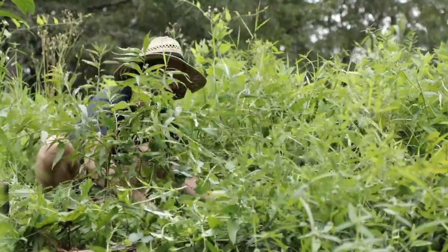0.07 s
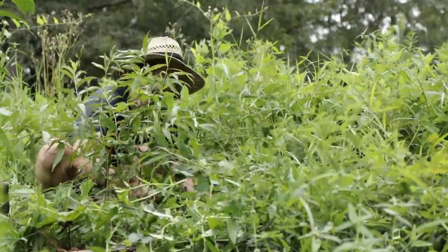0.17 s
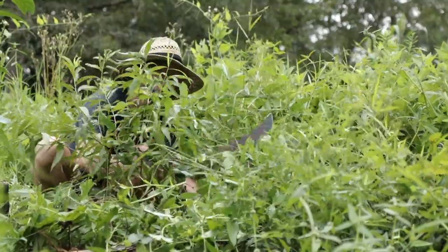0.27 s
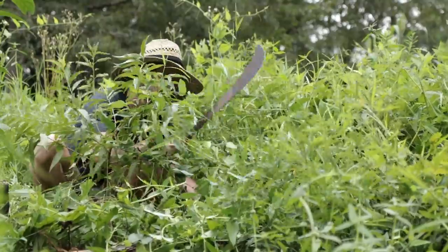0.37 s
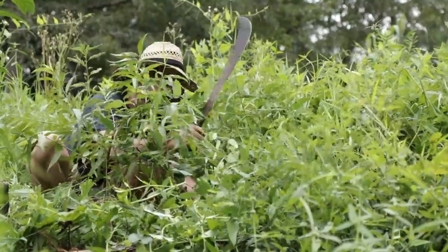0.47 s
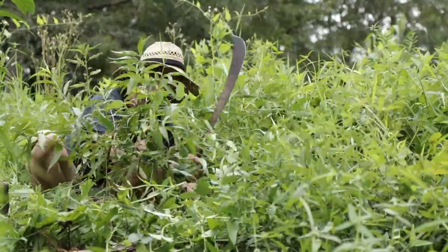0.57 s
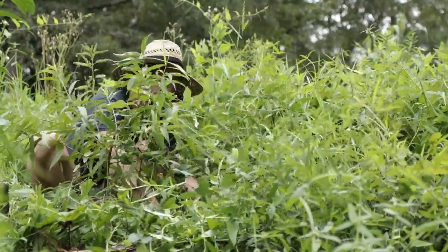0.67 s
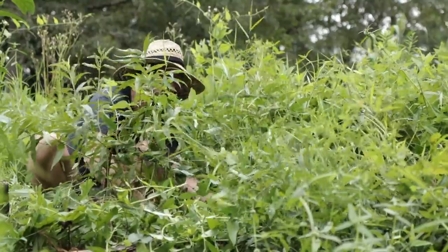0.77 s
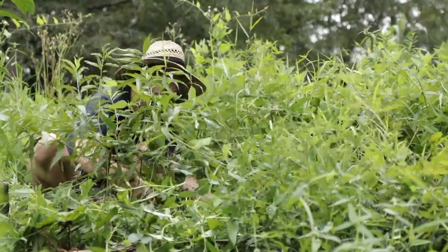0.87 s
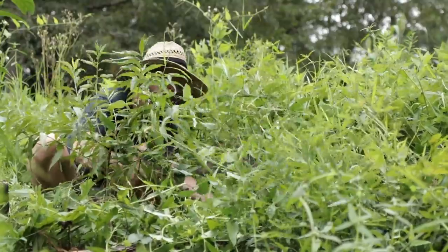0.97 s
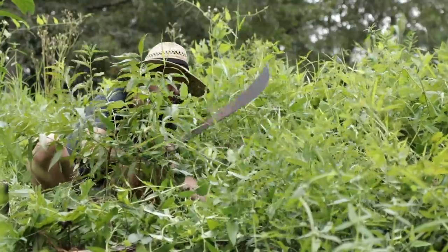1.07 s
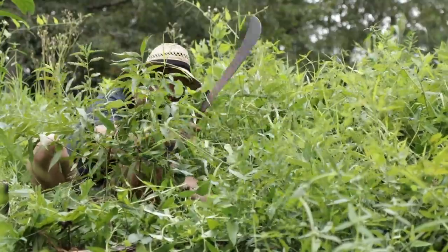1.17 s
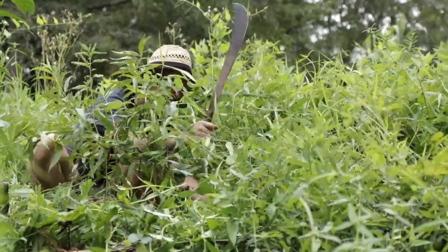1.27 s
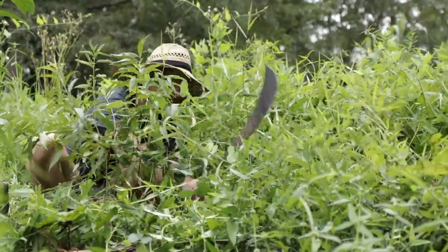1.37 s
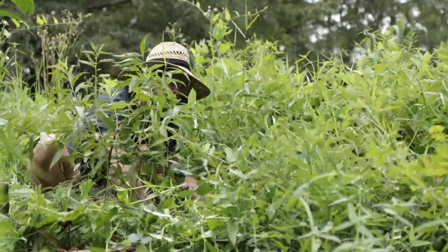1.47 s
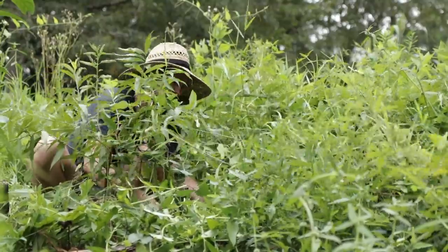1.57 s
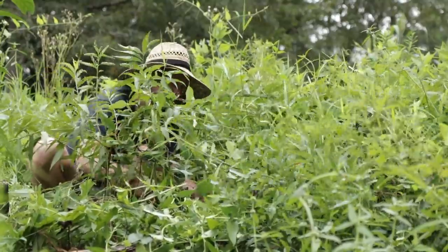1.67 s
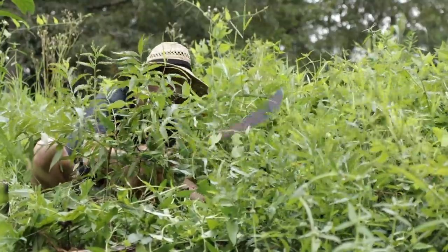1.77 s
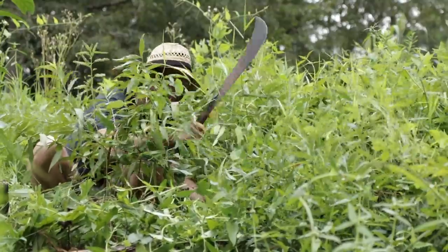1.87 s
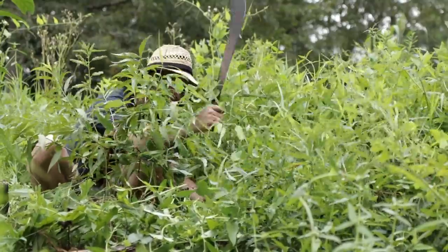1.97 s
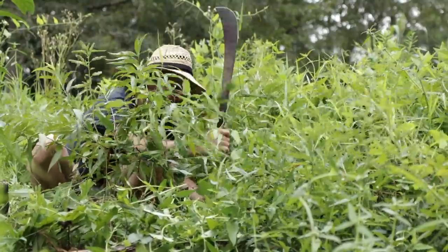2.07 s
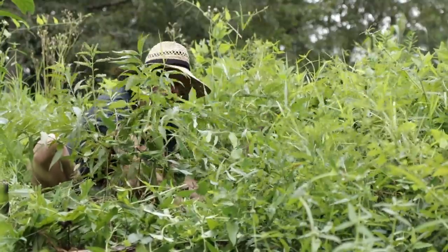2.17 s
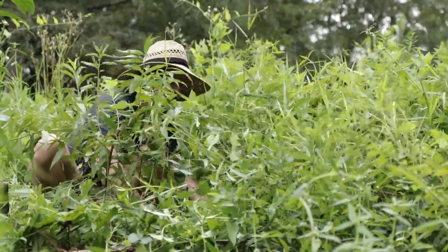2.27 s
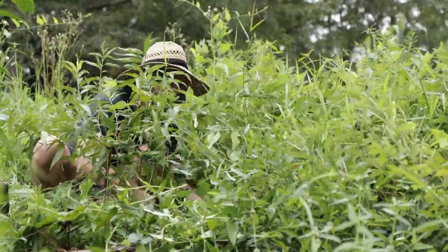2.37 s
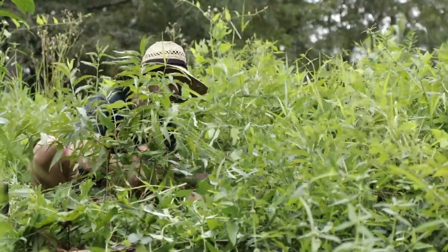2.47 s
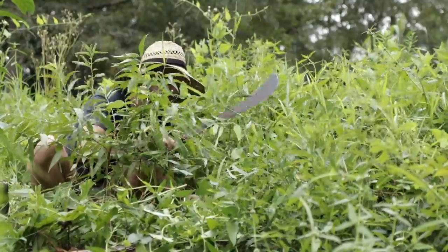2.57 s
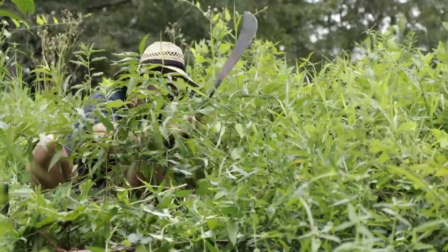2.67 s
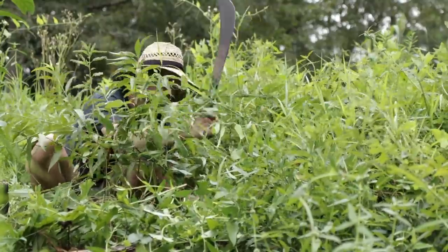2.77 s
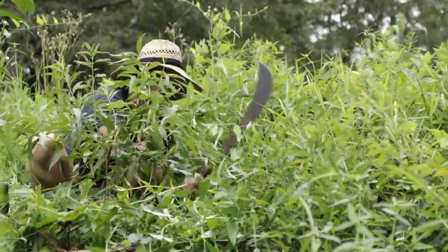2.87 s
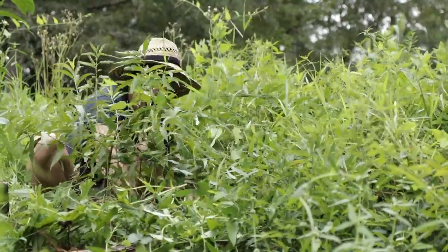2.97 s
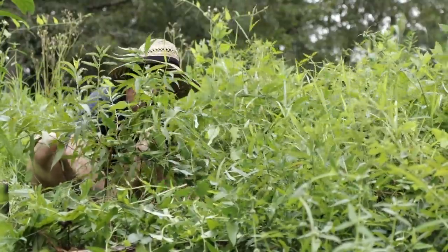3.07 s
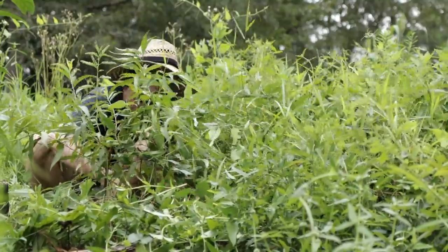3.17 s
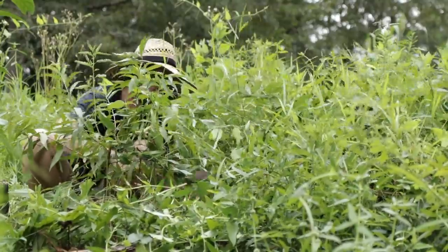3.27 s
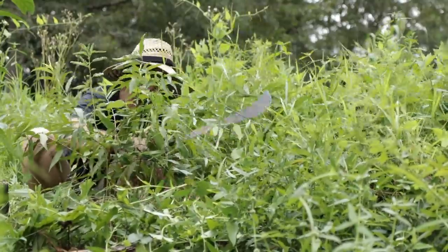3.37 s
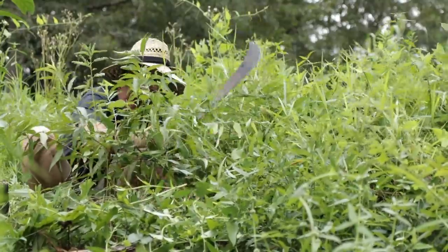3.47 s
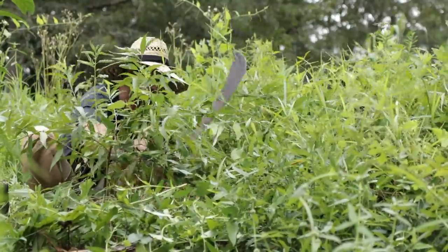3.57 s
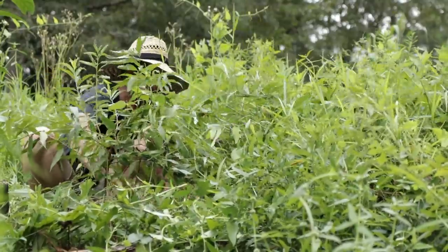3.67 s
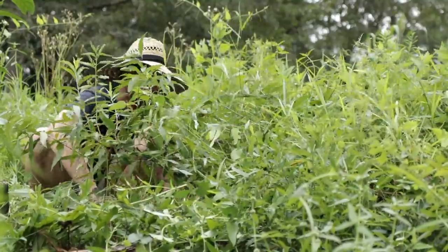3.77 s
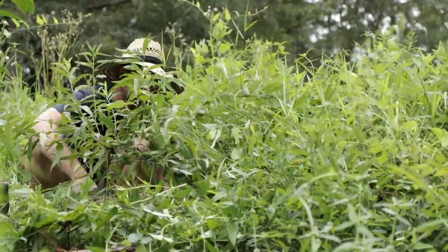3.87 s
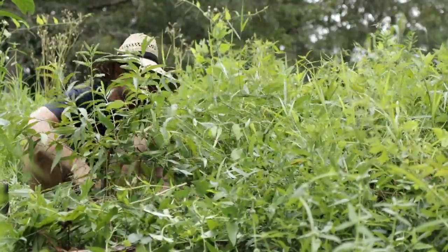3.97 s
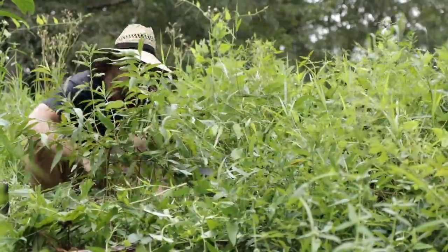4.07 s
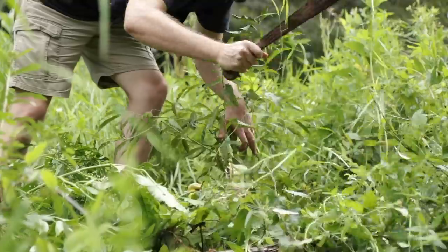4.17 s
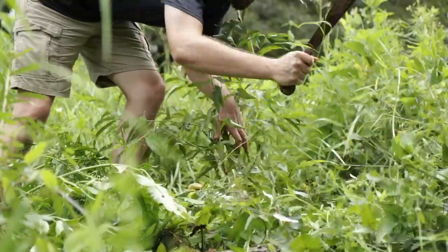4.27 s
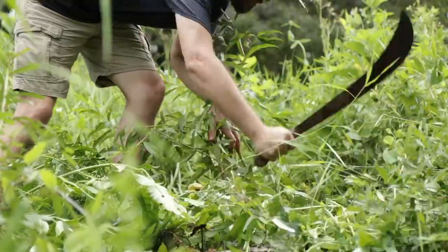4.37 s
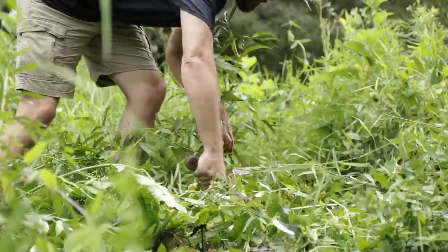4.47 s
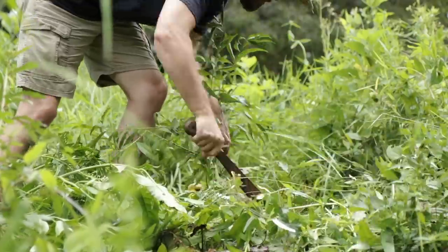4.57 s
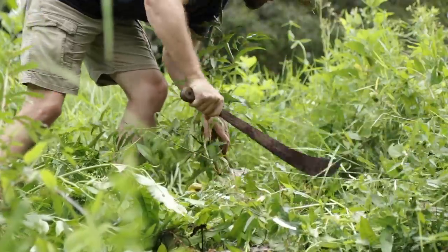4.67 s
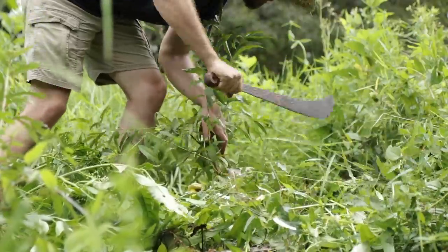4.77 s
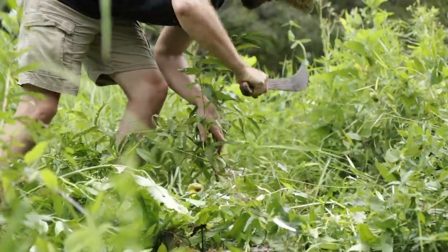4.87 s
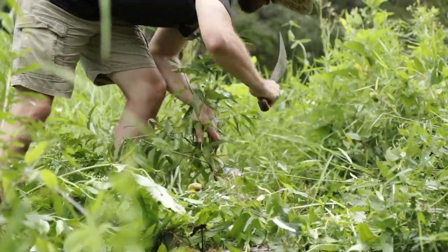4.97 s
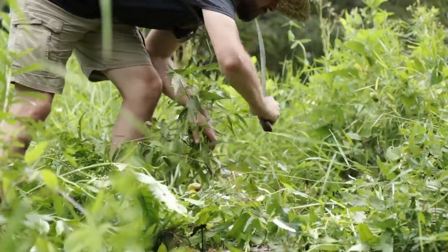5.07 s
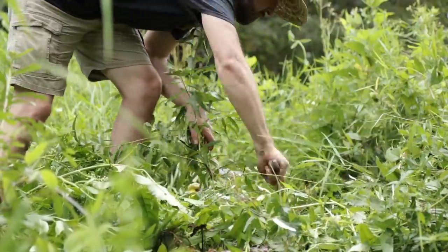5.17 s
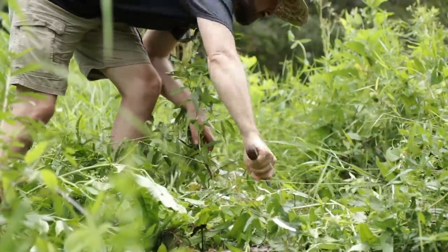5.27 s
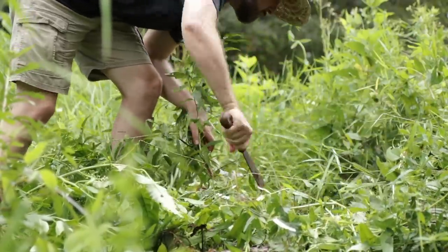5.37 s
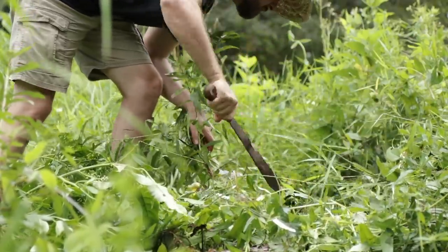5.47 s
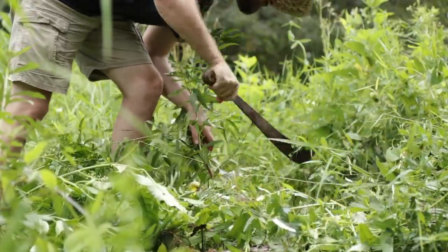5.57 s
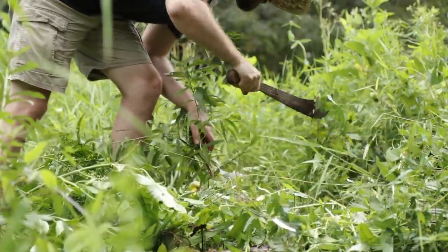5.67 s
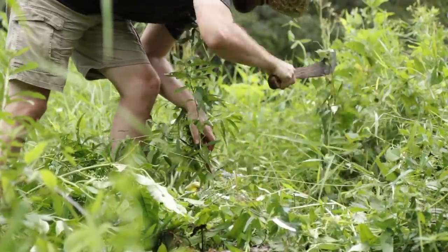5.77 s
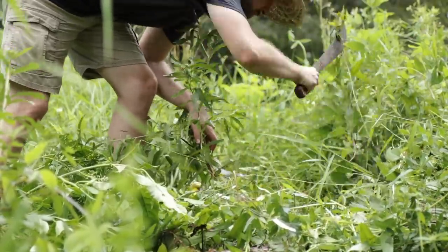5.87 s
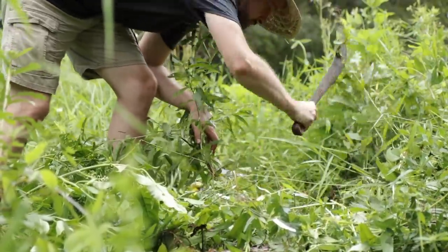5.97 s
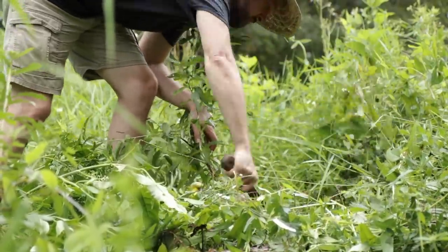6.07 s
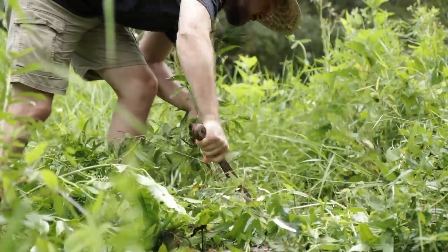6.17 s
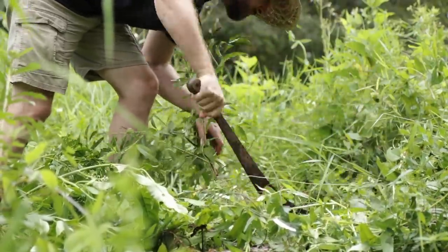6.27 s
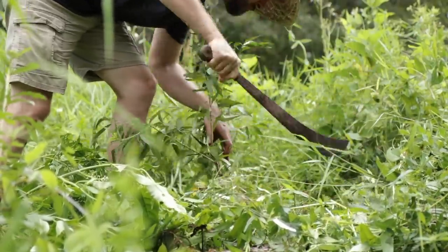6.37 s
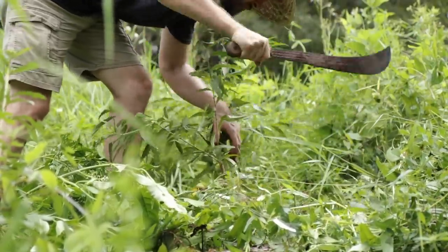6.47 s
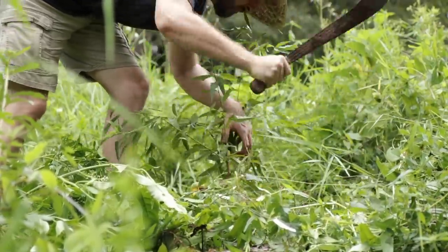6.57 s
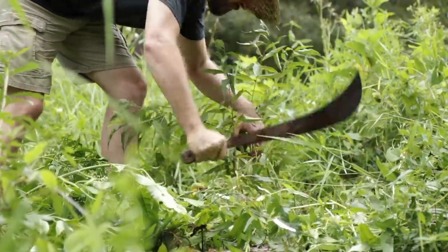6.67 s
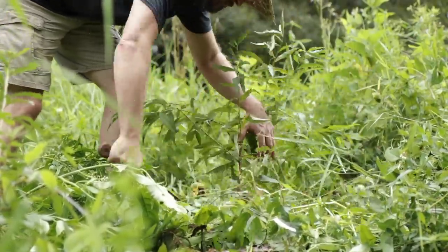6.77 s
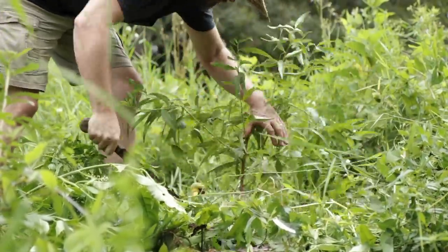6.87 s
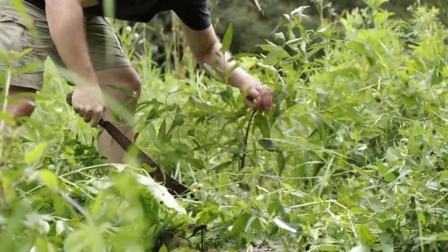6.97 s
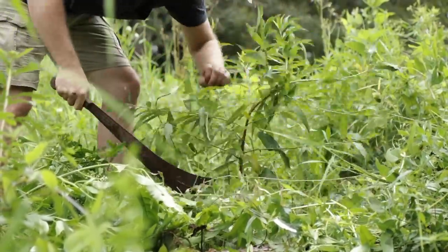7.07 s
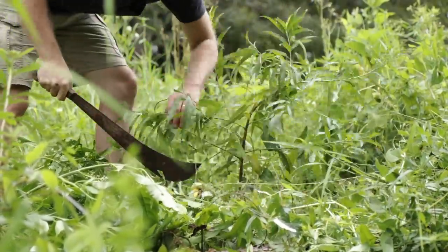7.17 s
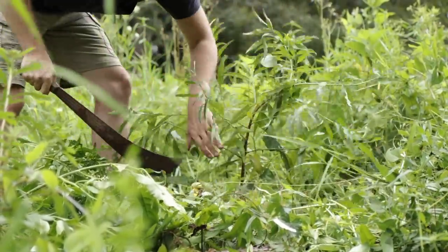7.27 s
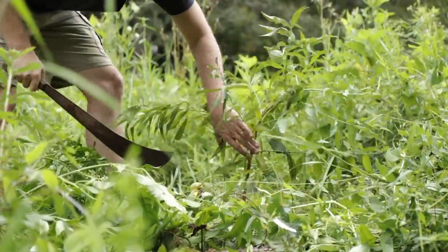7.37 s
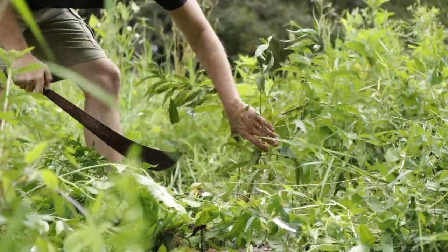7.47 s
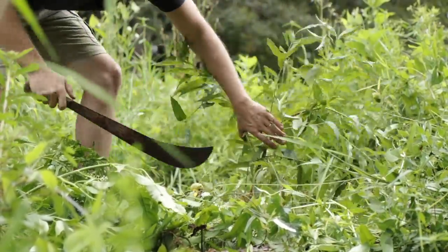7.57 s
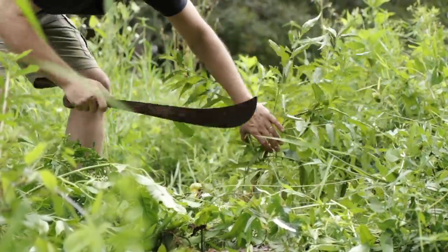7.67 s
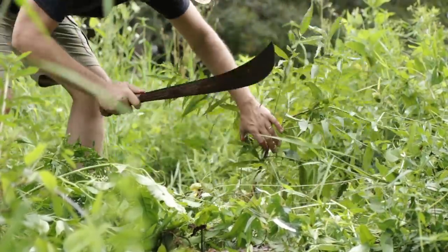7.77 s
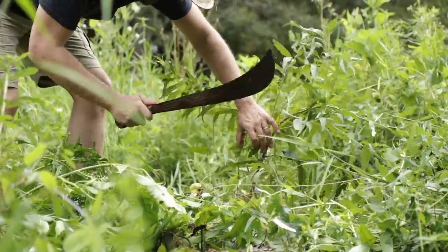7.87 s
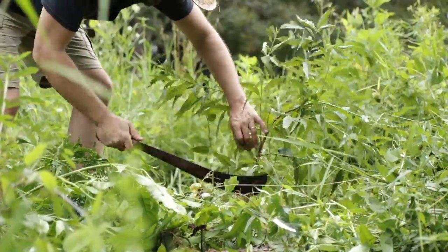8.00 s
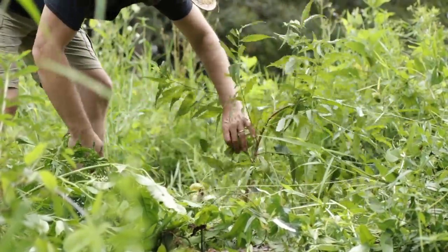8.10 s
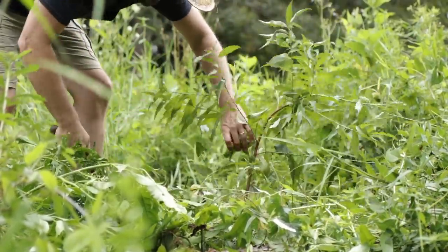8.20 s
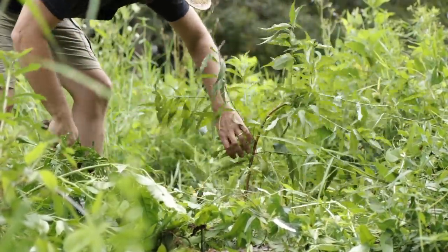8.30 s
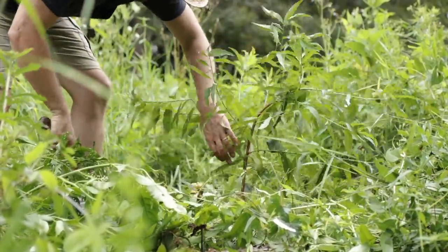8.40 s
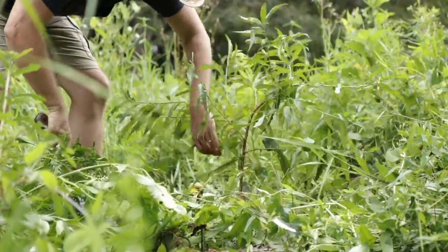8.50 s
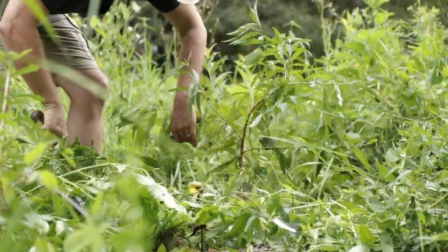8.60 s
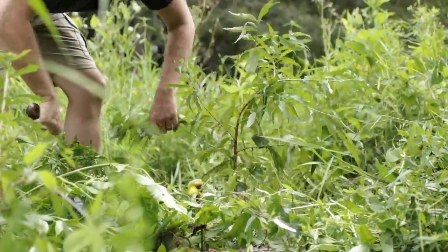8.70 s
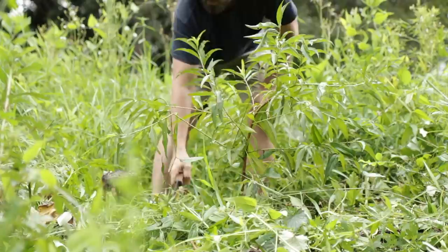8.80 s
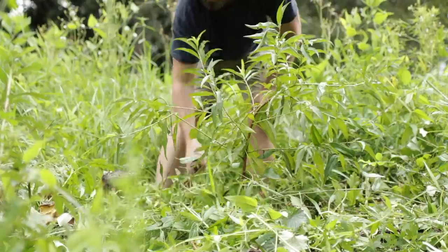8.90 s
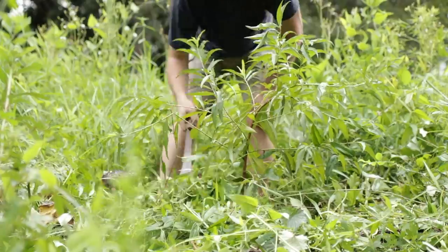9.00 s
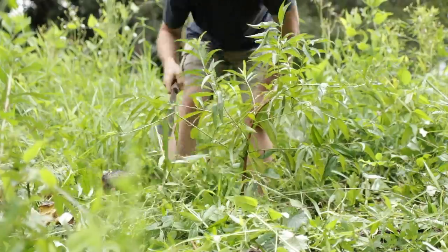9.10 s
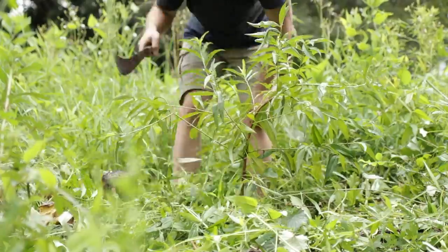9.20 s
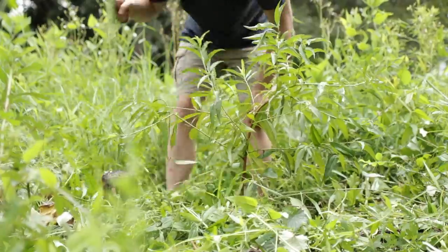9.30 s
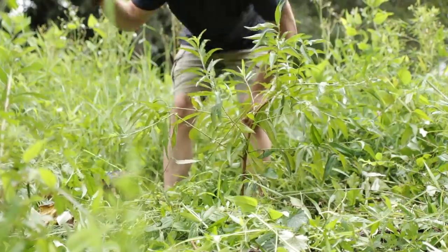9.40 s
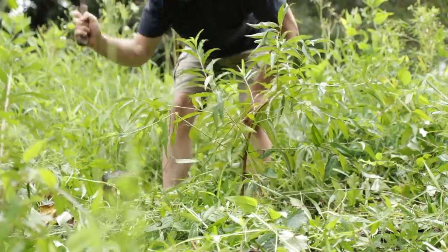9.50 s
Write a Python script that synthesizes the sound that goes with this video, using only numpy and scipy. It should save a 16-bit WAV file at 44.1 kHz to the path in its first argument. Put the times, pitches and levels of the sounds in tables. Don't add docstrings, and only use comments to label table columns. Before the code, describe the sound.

Crisp blade chops tear tall weeds with woody cracks, short steely rings and earthy thumps, leaves rustling after each one amid shimmering insects.

```python
import sys
import numpy as np
from scipy import signal
from scipy.fft import rfft, irfft, next_fast_len
from scipy.io import wavfile
from scipy.ndimage import uniform_filter1d

SR = 44100
rng = np.random.default_rng(int(sys.argv[2]) if len(sys.argv) > 2 else 0)


def ratio(d):
    e = np.asarray(d, float) / 20
    return 10 ** e


def dump_mix(stems):
    frames = np.atleast_2d(stems).T
    limited = np.clip(frames, -1, 1)
    pcm = np.round(limited * 32767).astype(np.int16)
    wavfile.write(sys.argv[1], SR, pcm)


N = 420713


def evened(x):
    return x / np.sqrt(np.mean(x ** 2) + 1e-20)


def shaped(x, points):
    hz, db = np.transpose(points)
    size = next_fast_len(len(x), real=True)
    f = np.fft.rfftfreq(size, 1 / SR)
    gain = ratio(np.interp(np.log(f + 1), np.log(hz), db))
    return irfft(rfft(x, size) * gain, size)[:len(x)]


def add(mix, s, sound):
    part = mix[round(s * SR):][:len(sound)]
    part += sound[:len(part)]


def resonate(x, hz, width):
    r = np.exp(-np.pi * width / SR)
    edge = (1 - r * r) / 2
    return signal.lfilter([edge, 0, -edge], [1, -2 * r * np.cos(2 * np.pi * hz / SR), r * r], x)


def drift(hz):
    count = int(N / SR * hz) + 2
    return np.interp(np.arange(N), np.linspace(0, N, count), rng.standard_normal(count))


def crackle(count, per_s, spread_db, smooth):
    size = ratio(spread_db * np.minimum(rng.exponential(1, count), 3))
    clicks = size * rng.standard_normal(count) * (rng.random(count) < per_s / SR)
    early, late = rng.standard_normal((2, 48)) * np.exp(-np.arange(48) / 11)
    even = np.arange(count) % 2
    grains = np.convolve(clicks * even, early, "same")
    grains += np.convolve(clicks * (1 - even), late, "same")
    return evened(evened(grains) + smooth * rng.standard_normal(count))


# enter_s, stop_s, enter_level_db, stop_level_db, brightness_db_per_octave
STEM_PASSES = [(.0, .013, -24.5, -25, -4), (.01, .022, -16.5, -17, -3.5), (.716, 0.74, -29, -22, -5),
               (0.733, 0.759, -18, -15.5, -5), (1.4998, 1.515, -13, -17.5, -4),
               (1.5275, 1.534, -10, -18, 1.5), (2.249, 2.254, -29, -25, -5.5),
               (2.258, 2.279, -17, -16.5, -3.5), (2.99, 3, -34, -25, -1.5), (2.998, 3.024, -14, -21, -3),
               (3.7345, 3.766, -24, -19, -3.5), (4.488, 4.502, -27, -29, -5), (4.512, 4.533, -18, -21, -1),
               (5.259, 5.303, -23.5, -18.5, -3), (6.141, 6.147, -27, -28, 1.5),
               (6.152, 6.16, -17, -16.5, 0), (6.7938, 6.814, -20.5, -13.5, -3),
               (8.137, 8.18, -33, -23.5, -3.5), (8.891, 8.895, -18, -18, -2),
               (8.8976, 8.906, -9, -20.5, -5)]
TEAR_RING_DB = -10
GRIPPED_SHARE = 0.075


def slices():
    tear, force = np.zeros((2, N))
    for enter, stop, enter_db, stop_db, bright_db in STEM_PASSES:
        noise = crackle(count=8192, per_s=5000, spread_db=4.0, smooth=1.27)
        t = np.arange(len(noise)) / SR
        top_db = 1.18 * bright_db * np.log2(16000 / 2500)
        colour = [(300, 0.0), (1000, -2.0), (1900, 4.5), (2500, 2.5), (16000, top_db)]
        lumps_db = 2 * evened(uniform_filter1d(rng.standard_normal(len(t)), 110))
        length = stop - enter
        level_db = np.interp(t, [0, length, length + 0.013, .18],
                             [enter_db, stop_db, stop_db - 15.5, stop_db - 40.5])
        onset = np.minimum(t / 0.0013, 1)
        sound = evened(shaped(noise, colour)) * ratio(level_db + lumps_db) * onset
        add(tear, enter, sound)
        add(force, enter, sound * ratio(TEAR_RING_DB))
    return tear + ratio(21.5) * blade(force, GRIPPED_SHARE)


# pitch_hz, level_db, t60_s
BLADE_MODES = [(1470, -7, 0.17), (2220, 4, 0.4), (3030, -15, 0.72), (3872, 4, 0.4), (4720, 5, 0.59),
               (5457, 7.5, 0.64), (6020, 3, 0.39), (6710, 5, 0.32), (9950, -11, .2), (10900, -11.5, .2),
               (11300, -6, 0.24)]


def blade(force, share):
    ring = np.zeros(len(force))
    for hz, db, t60 in BLADE_MODES:
        held_t60 = t60 * share
        ring += ratio(db) * resonate(force, hz, 4.8 / held_t60) * np.sqrt(held_t60)
    return ring


# start_s, knock_level_db, thock_level_db, pitch_factor, jolt_spread_s
SOIL_BLOWS = [(0.0192, -8.5, -3.5, 1.17, .0065), (.7545, -22, -17, .85, .006),
              (1.511, -14, -17.5, 0.89, 0.006), (1.529, -20, -20, .93, 0.0063), (2.2735, -7, -6, .76, .005),
              (3.0158, -4, -7, 0.9, 0.0069), (3.7592, -10, -10, 0.93, .0063), (4.5225, -14, -17, .8, .005),
              (5.277, -19, -16.5, 1.2, 0.014), (6.1532, -21, -13, 1.0, 0.0054),
              (6.8085, -12, -9, 1.1, 0.005), (8.155, -28, -24.5, 1.03, .021), (8.9, -10, -13, 1.05, 0.0078)]
# weight_db, firmness_pitch_factor, shudder_level_db, shudder_pitch_hz, shudder_t60_s
GROUND_UNDER_BLOW = [(-11, .8, -22, 76, .4), (-10.5, .85, -24, 74, .54), (-15, 0.87, -25.5, 84, 0.42),
                     (-27, .79, -45, 84, .3), (-8.5, 1.184, -29.5, 86, .46), (-6.5, 1.1, -36.5, 87, .48),
                     (-10.5, 1.03, -31, 65.5, 0.34), (-10.5, .85, -32, 70, 0.46), (-15, 1.25, -33, 58, .25),
                     (-18, 1.21, -33, 60.4, 0.31), (-18.5, 0.8, -38, 66, 0.65), (-30, 0.94, -45, 70, .3),
                     (-20, 1.1, -35, 53, 1.5)]
# pitch_hz, t60_s
SOIL_MODES = [
    (1800, 0.006),
    (623, 0.032),
    (307.5, 0.07),
    (156.5, 0.14),
]
DEEP_DB, SHUDDER_LAG_S = 2, .014
KICK_DB, KICK_T60_S, LOOSE_HZ = 3.0, .13, 30


def thuds():
    out, t = np.zeros(N), np.arange(SR) / SR
    for blow, ground in zip(SOIL_BLOWS, GROUND_UNDER_BLOW):
        s, knock_db, thock_db, edge, spread = blow
        weight_db, body, low_db, low_hz, low_t60 = ground
        deep_db = (weight_db + low_db) / 2 + DEEP_DB
        levels_db = [knock_db, thock_db, weight_db, deep_db]
        for db, (hz, t60), firm in zip(levels_db, SOIL_MODES, [edge, edge, body, body]):
            when, size = rng.random((2, 5))
            jolts = np.zeros(8192)
            jolts[0] = 1
            np.add.at(jolts, (when * spread * SR).astype(int), size - .4)
            shake = np.zeros(len(jolts))
            for detune in (.88, 1.13):
                narrow = resonate(jolts, hz * firm * detune, 3.1 / t60)
                shake += resonate(narrow, hz * firm, 1.2 * hz)
            add(out, s + 0.7 / hz, ratio(db) * shake / abs(shake).max())
        wobble = resonate(rng.standard_normal(SR), low_hz, LOOSE_HZ)
        loose = evened(resonate(wobble, low_hz, 2 * LOOSE_HZ))
        kick = ratio(KICK_DB - 60 * t / KICK_T60_S) * np.sin(2 * np.pi * low_hz * t)
        swing = kick + .55 * ratio(-60 * t / low_t60) * loose
        add(out, s + SHUDDER_LAG_S, ratio(low_db) * swing * np.minimum(t / 0.0038, 1))
    return out


# start_s, peak_level_db, pitch_hz
EDGE_CRACKS = [(.0208, 1.5, 1450), (.7175, -14, 1280), (.7372, -3, 2140), (.7475, -4, 2000),
               (.751, -5, 2200), (.7575, -5, 1200), (1.5004, -4, 1600), (1.5068, -2, 2000),
               (1.5117, -5, 1500), (1.5283, -9, 2200), (2.259, -7, 2220), (2.264, 1, 2800),
               (2.2743, -1, 1900), (3.002, -8, 2200), (3.006, -4, 2200), (3.0165, 3, 1590),
               (3.0175, -1, 1600), (3.0202, -3, 600), (3.025, -9, 2100), (3.7612, 0, 1100),
               (3.7627, -2, 1700), (4.4935, -10, 2000), (4.494, -12, 1400), (4.4938, -12, 2900),
               (4.514, -7, 2200), (4.525, -5, 1900), (5.2615, -9, 2100), (5.284, -5, 2200),
               (4.5272, 1, 7500), (4.5278, -2, 7000), (4.528, -6, 1900), (5.278, -6, 2150),
               (6.1422, -12, 8500), (6.143, -11, 11000), (6.1545, -1, 2200), (6.157, 2, 10500),
               (6.1576, 2, 11000), (6.158, 0, 6800), (6.161, -5, 11500), (6.795, -5, 2700),
               (6.8074, -4, 2200), (6.8108, -2, 2300), (8.151, -9, 1910), (8.8983, -1, 2400),
               (8.8998, 1, 4000), (8.902, -8, 720)]
# start_s, peak_level_db, pitch_hz
STEM_SNAPS = [(1.01, -27, 1490), (1.031, -20, 1800), (1.03, -27, 4800), (1.044, -29, 1400),
              (1.212, -30, 4600), (1.431, -33, 3780), (1.7458, -21, 1680), (1.747, -27, 450),
              (1.797, -28, 5450), (1.802, -28, 1300), (1.968, -32, 1150), (2.003, -34, 1400),
              (1.184, -33, 3800), (1.908, -27, 2330), (2.491, -24, 4700), (2.641, -24, 926),
              (2.6415, -28, 3500), (2.707, -32, 4000), (3.12, -26, 3500), (3.127, -27, 1300),
              (3.19, -29, 3300), (3.293, -27, 4500), (3.369, -29, 4900), (3.442, -33, 1610),
              (3.898, -32, 3300), (4.035, -33, 1400), (4.381, -33, 1710), (3.292, -27, 1800),
              (3.369, -31, 1960), (3.72, -25, 2190), (4.405, -25.5, 3560), (4.423, -24, 3690),
              (4.456, -22, 2250), (4.4665, -19, 4590), (4.488, -15, 1400), (4.4885, -15, 2800),
              (4.764, -21.5, 2830), (5.094, -26, 1630), (5.522, -27, 2460), (5.63, -26, 3830),
              (5.793, -24, 5940), (6.241, -22, 1500), (6.259, -28, 1500), (6.18, -22, 4200),
              (7.005, -29, 3800), (7.034, -26, 2230), (7.089, -23, 2190), (7.088, -28, 4200),
               (7.119, -27, 5900), (7.195, -26, 1450), (7.196, -28, 3800), (7.228, -35, 4200),
               (7.331, -29, 1460), (7.466, -37, 1170), (7.503, -34, 1200), (7.537, -32, 721),
               (7.576, -30, 953), (7.588, -29, 1500), (7.61, -26, 1690), (7.626, -28, 800),
               (7.656, -26, 1800), (7.675, -29, 900), (7.717, -31, 2000), (7.757, -33, 1500),
               (8.217, -20, 2020), (8.275, -28, 1500), (8.308, -27, 2200), (8.349, -26, 5400),
               (8.36, -25, 5200), (8.356, -27, 6600), (8.366, -26, 5300), (8.371, -28, 6800),
               (8.487, -28, 5500), (8.369, -33, 829), (8.406, -29, 3000), (8.444, -31, 1160),
               (8.476, -28, 6500), (8.483, -24, 9000), (8.527, -27, 2410), (8.573, -31, 3000),
               (8.598, -24, 5200), (8.659, -29, 2500), (8.705, -33, 945), (8.752, -30, 2500),
               (8.81, -31, 2600), (9.019, -27, 2550), (9.099, -28, 1730), (9.278, -28, 600),
               (9.295, -30, 1100), (9.313, -29, 600), (9.371, -30, 2020)]
GRIPPED_RING_DB, FREE_RING_DB = -26, -15


def snaps():
    out, force = np.zeros((2, N))
    t = np.arange(700) / SR
    for k, (s, db, hz) in enumerate(EDGE_CRACKS + STEM_SNAPS):
        burst = rng.standard_normal(len(t)) * (np.exp(-t / .0006) + .12 * np.exp(-t / .005))
        burst[0] = 4
        sound = resonate(burst, hz, 0.3 * hz) + 0.06 * resonate(burst, max(hz, 3500), 4500)
        sound *= ratio(db - 2.5) / abs(sound).max()
        ring_db = GRIPPED_RING_DB if k < len(EDGE_CRACKS) else FREE_RING_DB
        add(out, s + .0005, sound)
        add(force, s, sound * ratio(ring_db))
    return out + ratio(22) * blade(force, .2)


# start_s, pitch_hz, level_db, t60_s
SINGING_MODES = [(1.05, 5457, -42, 0.25), (1.052, 6710, -45, .4), (1.04, 2225, -51, .25),
                 (1.8, 3058, -50, 0.5), (1.8, 5457, -48, .25), (3.021, 3872, -17, 0.06),
                 (3.022, 5457, -22, .07), (.649, 4850, -36, .03), (4.495, 2225, -29, 0.2),
                 (4.615, 3872, -41, 0.37), (4.615, 3058, -47.5, .6), (6.06, 3058, -47, .4),
                 (6.144, 3872, -26, .1), (6.69, 1405, -48, .3), (2.283, 2225, -32, 0.3),
                 (6.9, 2225, -38, 0.25), (.3, 5457, -49, 0.45), (6.095, 5457, -47, 0.2),
                 (1.02, 5457, -47, .3), (5.54, 3058, -51, .4), (1.05, 4690, -51, .2),
                 (4.075, 3881, -50, .5), (4.025, 2225, -49, .15), (3.79, 2225, -42, .25),
                 (6.305, 3887, -47, .2), (6.3, 3058, -54, 1.1), (6.29, 2225, -49, .4),
                 (7.05, 4680, -42, .5), (7.1, 4680, -41, .3), (7.01, 6710, -44, .4), (7.018, 2160, -38, .2),
                 (7.12, 2225, -40, .35), (7.12, 3880, -42, .3), (7.015, 5457, -45, .3),
                 (7.03, 3890, -45, .4), (7.06, 2225, -40, .3), (7.09, 2225, -41, .2), (7.14, 3058, -52, .7),
                 (7.13, 5457, -49, .4), (7.012, 2225, -37, .3), (7.0363, 2225, -37, .3),
                 (7.022, 3058, -40, .85), (7.0361, 3058, -41, .3), (7.034, 5457, -35, .3),
                 (7.038, 6710, -35, .25), (7.086, 4680, -39, .3), (7.088, 5457, -41, 0.2),
                 (7.128, 2225, -42, .2), (7.13, 3872, -44, .2), (7.395, 1436, -49, 0.1),
                 (7.418, 1470, -44, 0.16), (8.08, 1386, -47, .3), (8.73, 1390, -47, 0.27)]


def notes():
    out, t = np.zeros(N), np.arange(SR // 2) / SR
    onset = np.minimum(t / 0.004, 1)
    for s, hz, db, t60 in SINGING_MODES:
        add(out, s, ratio(db - 60 * t / t60) * np.sin(2 * np.pi * hz * t) * onset)
    return out * ratio(2.2 * drift(40))


# start_s, shower_level_db, settling_level_db, settling_fade_db_per_s
LEAF_FALLS = [(.03, -33, -44, 19.5), (.77, -38.5, -48, 8), (1.545, -42, -43, 23), (2.285, -34.5, -41, 30),
              (3.03, -42, -36.5, 28), (3.775, -47, -48, 8), (4.54, -55, -46.5, 17), (5.309, -35.5, -44, 10),
              (6.17, -40, -47, 22), (6.825, -46, -48.5, 7), (8.19, -44, -44.5, 6), (8.915, -55, -45.5, 21)]
# centre_s, level_db, half_length_s, dull_relative_db
SWEEPS = [(0.31, -48, 0.045, -10), (1.033, -41, 0.011, -6), (3.345, -48, 0.046, -18), (4.29, -56, 0.09, -5),
          (4.884, -42, 0.041, -4), (5.546, -50, 0.03, -23), (5.79, -51, 0.04, -11), (6.1, -49, 0.03, -10),
          (7.339, -43.5, 0.008, -8), (4.45, -51, .04, -2), (6.26, -45, .04, -12), (6.335, -50, .04, -12),
          (8.31, -50, .015, 0), (6.996, -39, .02, -11), (7.04, -43, .03, -5), (8.79, -51, .05, -8),
          (9.1, -44, .06, -5), (9.23, -47, .04, -5), (8.362, -47, .008, -30), (8.483, -49, .006, -30),
          (7.2, -51, .03, -8), (6.93, -50, .04, -8), (9.7, -46, 0.025, -4), (7.655, -44, 0.05, 4),
          (7.105, -40, 0.025, -8), (8.202, -48, .03, -10), (9.295, -53, 0.015, 7), (0.423, -62, 0.061, -14),
          (2.646, -48, 0.0057, -0.5)]
# pitch_hz, density_db_per_hz
LEAF_COLOUR = [(710, -43), (1200, 3.5), (1510, 4), (8170, -0.5), (12100, -9), (14700, -32), (16000, -37)]
SHOWER_DB_PER_S, SHOWER_DULL_DB, SETTLE_DULL_DB = 131, -2.5, -5
TRAIL = 1.15


def rustle():
    t = np.arange(N) / SR
    crisp_gain, dull_gain = np.zeros((2, N))
    for s, shower_db, settle_db, fade_db in LEAF_FALLS:
        first = round(s * SR)
        span = slice(first, first + 2 * SR)
        since = t[span] - s
        shower = ratio(shower_db - SHOWER_DB_PER_S * since)
        settle = ratio(settle_db - fade_db * since)
        crisp_gain[span] = shower + settle
        dull_gain[span] = shower * ratio(SHOWER_DULL_DB) + settle * ratio(SETTLE_DULL_DB)
    for s, db, half, dull_db in SWEEPS:
        swell = np.arange(0, .5, 1 / (4 * half * SR))
        die_away = np.arange(.5, 1, 1 / (4 * TRAIL * half * SR))
        sweep = ratio(db) * np.sin(np.pi * np.r_[swell, die_away]) ** 2
        add(crisp_gain, s - 2 * half, sweep)
        add(dull_gain, s - 2 * half, sweep * ratio(dull_db))
    crisp = shaped(leaves(), [(600, -30)] + LEAF_COLOUR[1:])
    dull = shaped(crackle(count=N, per_s=600, spread_db=3.0, smooth=1.6),
                  [(150, -24), (400, 4.5), (1200, -4), (2400, -5.5), (5000, -23.5)])
    flutter_db = 1.3 * drift(45)
    return (evened(crisp) * crisp_gain + evened(dull) * dull_gain) * ratio(flutter_db)


def leaves():
    ticks = np.zeros(N)
    for hz in np.geomspace(1500, 9000, num=6):
        grains = crackle(count=N, per_s=520, spread_db=3.0, smooth=.85)
        ticks += evened(resonate(grains, hz, .45 * hz)) * np.sqrt(hz)
    return evened(ticks) + .6 * rng.standard_normal(N)


# time_s, chorus_level_db, bush_cricket_level_db
INSECT_LEVELS = [(0, -44, -48), (.8, -44, -49), (1.7, -43.5, -56), (2.36, -45, -49), (3.5, -44.5, -57),
                 (4.1, -45.5, -55), (4.3, -46.5, -47), (5.85, -50, -48.5), (6.4, -45.5, -45),
                 (7.1, -49, -43.5), (7.76, -47.5, -46.5), (8.8, -48.5, -47), (9.01, -46, -51),
                 (9.54, -46.5, -52)]
THROB_HZ = 47.2
UPPER_DB = -53.5


def insects():
    t = np.arange(N) / SR
    s, *levels = np.transpose(INSECT_LEVELS)
    chorus_db, cricket_db = (np.interp(t, s, db) for db in levels)
    turns = np.cumsum(THROB_HZ * (1 + 0.0043 * drift(1.7))) / SR
    teeth = crackle(count=N, per_s=4000, spread_db=0.0, smooth=0.28)
    throb = 1 + 0.3 * np.cos(2 * np.pi * turns + 3 * drift(1.6))
    chorus = resonate(resonate(teeth, 7950, 570), 7770, 730) * throb
    upper = resonate(resonate(rng.standard_normal(N), 9950, 1300), 9720, 1500)
    bands = evened(chorus) * ratio(chorus_db) + evened(upper) * ratio(UPPER_DB + .9 * drift(2.5))
    return bands + cricket(cricket_db, turns)


# start_s, peak_level_db
LONE_STROKES = [
    (3.4594, -41),
    (3.5444, -36),
    (3.6157, -39),
    (3.6844, -37),
    (3.8272, -34),
    (3.905, -32),
    (3.9774, -36),
]
# pitch_hz, width_hz, level_db
WING_MODES = [(12600, 600, -7), (13250, 400, -2), (13700, 400, -1), (14150, 400, 0), (14600, 400, 0),
              (15050, 400, -1), (15400, 350, -4)]


def cricket(level_db, turns):
    throb = .5 + .5 * np.cos(2 * np.pi * turns + 1.2 * drift(6))
    stroke = ratio(level_db) * (0.33 + throb ** 1.05)
    for s, db in LONE_STROKES:
        add(stroke, s, ratio(db - 10) * signal.windows.hann(420))
    teeth = rng.standard_normal(N)
    wing = np.zeros(N)
    for hz, width, db in WING_MODES:
        wing += ratio(db + 2.3 * drift(3)) * resonate(resonate(teeth, hz, width), hz, 4 * width)
    return 1.27 * evened(wing) * stroke


# start_s, pitch_hz, width_hz, level_db
NEARER_SINGER = (8.5, 9980, 160, -58)


def late_cricket():
    s, hz, width, db = NEARER_SINGER
    trill = evened(resonate(resonate(rng.standard_normal(N), hz, width), hz, 2 * width))
    return ratio(db) * trill * np.clip((np.arange(N) / SR - s) / .05, 0, 1)


# pitch_hz, density_db_per_hz
AIR_COLOUR = [(15, -59.5), (25, -10.5), (108, -5), (202, -6), (231, -1), (366, -10.5), (397, -22.5),
              (1210, -14), (1670, -21), (4950, -30.5), (6850, -30), (7630, -7.5), (8980, -24.5),
              (13900, -17.5), (16300, -33)]
# multiple, level_db
HUM_HARMONICS = [(2, -54.5), (3, -58), (4, -51), (5, -54.5), (6, -63.5)]
AIR_DB, HUM_HZ = -45, 58.66


def distance():
    wash = evened(shaped(rng.standard_normal(N), AIR_COLOUR)) * ratio(AIR_DB + 2.0 * drift(4))
    turns = np.cumsum(HUM_HZ * (1 + 0.00407 * drift(2))) / SR
    hum = np.zeros(N)
    for k, db in HUM_HARMONICS:
        hum += ratio(db + 1.5 + 2.0 * drift(9)) * np.sin(2 * np.pi * k * turns + drift(14))
    return wash + hum


def scene():
    strokes = slices() + thuds() + snaps() + notes()
    return (strokes + rustle() + insects() + late_cricket() + distance())[None]


def top_cut(x):
    return signal.sosfilt(signal.butter(12, 16460, fs=SR, output="sos"), x)


EDGE_HZ = 15770
DUCK_FROM_DB, DUCK_SHARE, RECOVER_DB_PER_S = -29.5, 0.15, 73


def record(dry):
    cut = signal.sosfilt(signal.butter(3, 48, "high", fs=SR, output="sos"), dry)
    lowpass = signal.firwin(1023, EDGE_HZ, window=("kaiser", 9), fs=SR)
    cut = signal.oaconvolve(cut, lowpass[None], "same")
    average = np.ones(880) / 880
    power_db = 10 * np.log10(signal.oaconvolve(cut[0] ** 2, average)[:N].clip(1e-12))
    fall = np.arange(N) * RECOVER_DB_PER_S / SR
    held_db = np.maximum.accumulate(power_db + fall) - fall
    over_db = np.maximum(held_db - DUCK_FROM_DB, 0)
    cut = cut / ratio(DUCK_SHARE * signal.oaconvolve(over_db, average)[:N])
    mix = np.clip(cut, -.92, .92)
    return top_cut(mix)


dry = scene()
out = record(dry)
dump_mix(out)
```